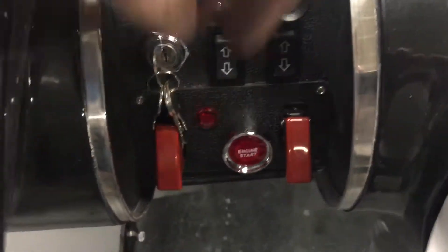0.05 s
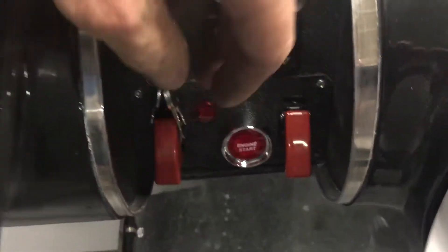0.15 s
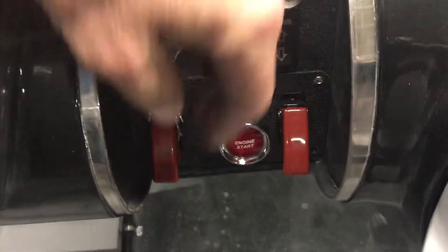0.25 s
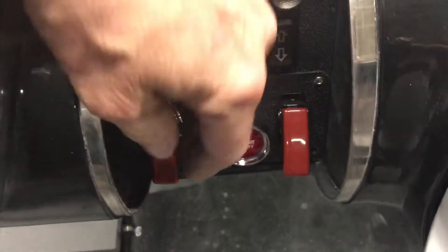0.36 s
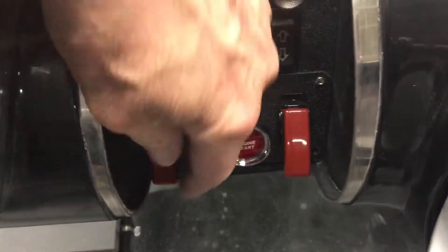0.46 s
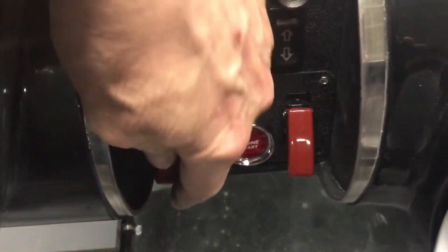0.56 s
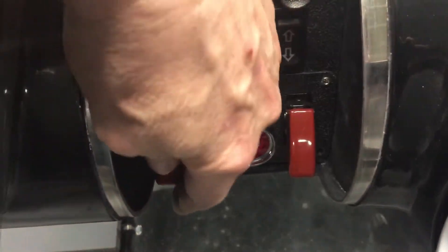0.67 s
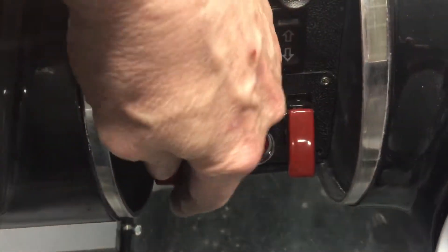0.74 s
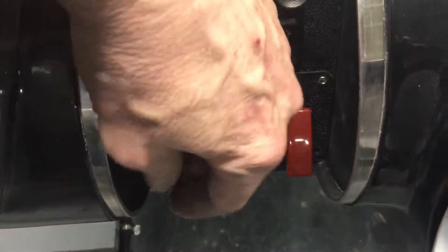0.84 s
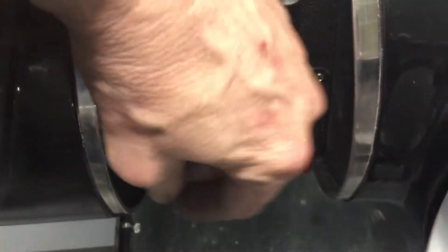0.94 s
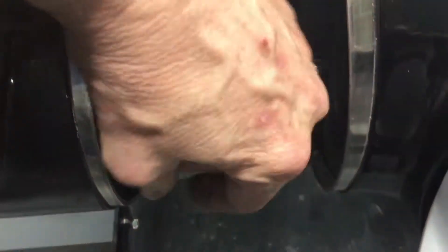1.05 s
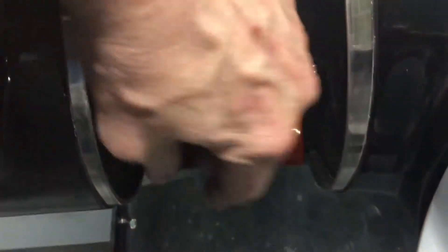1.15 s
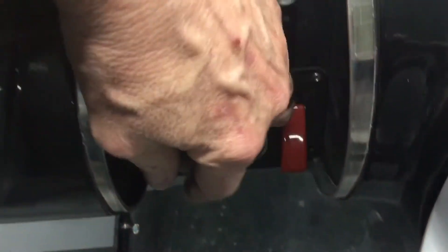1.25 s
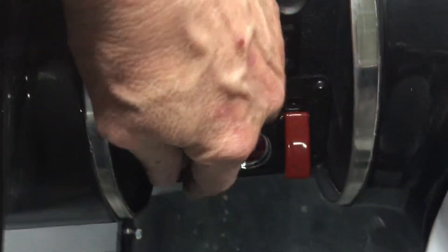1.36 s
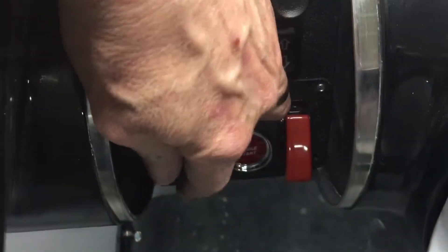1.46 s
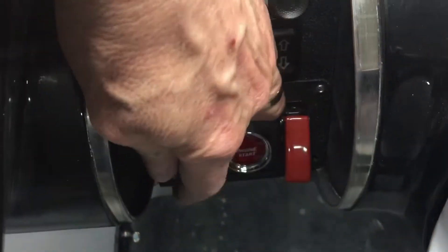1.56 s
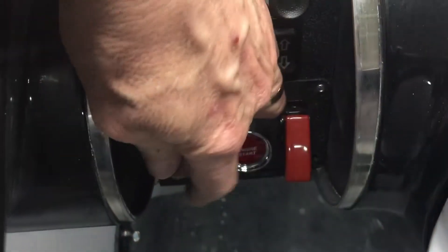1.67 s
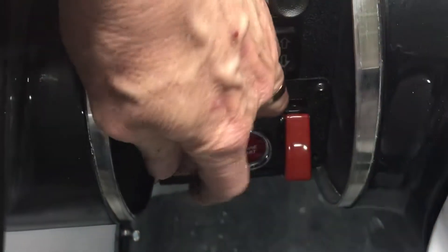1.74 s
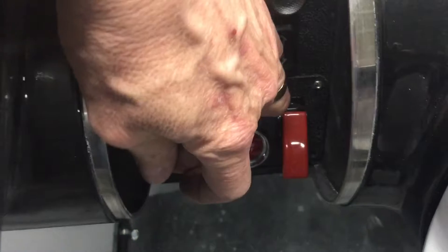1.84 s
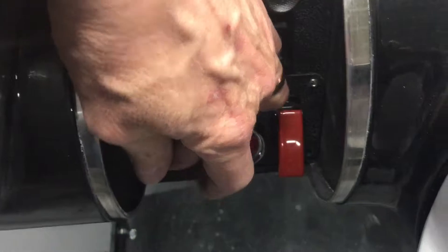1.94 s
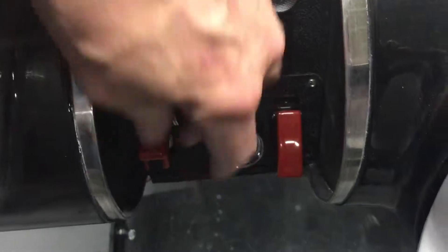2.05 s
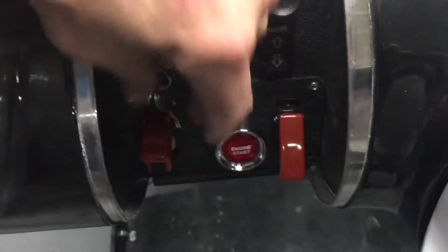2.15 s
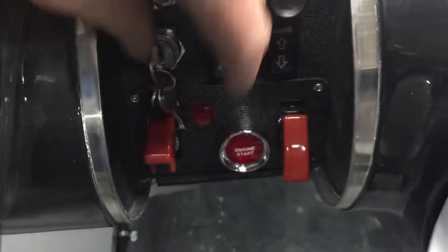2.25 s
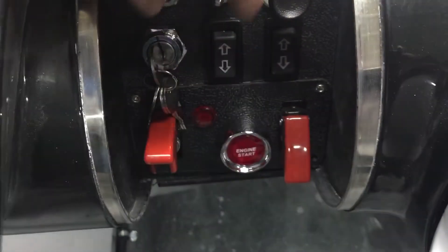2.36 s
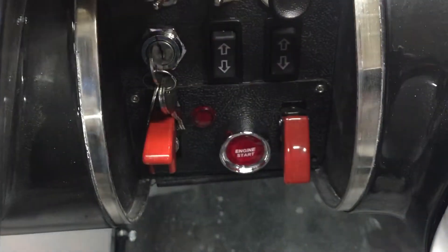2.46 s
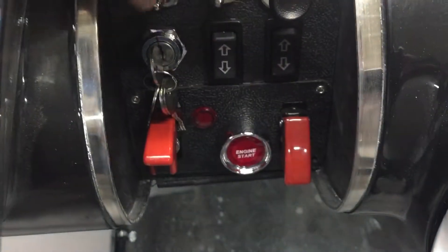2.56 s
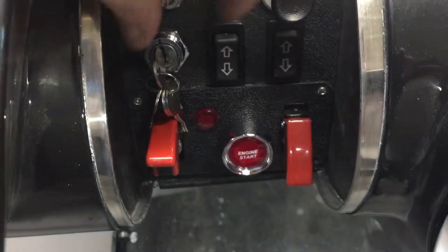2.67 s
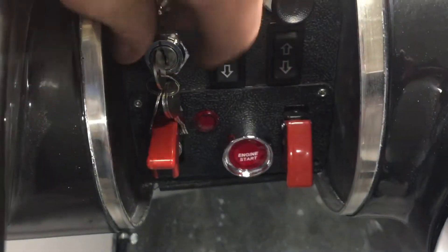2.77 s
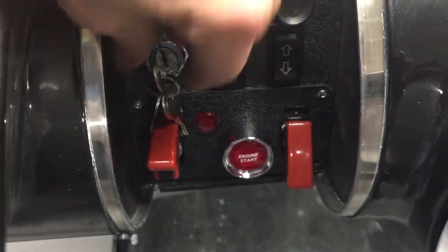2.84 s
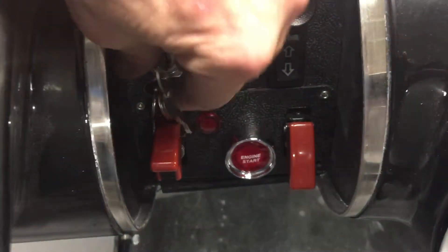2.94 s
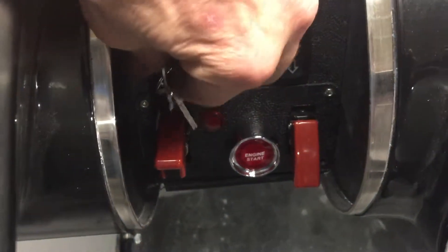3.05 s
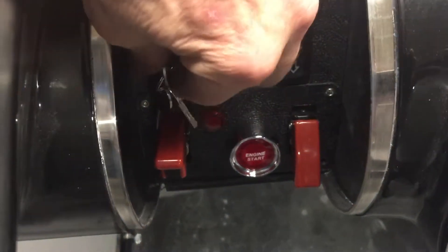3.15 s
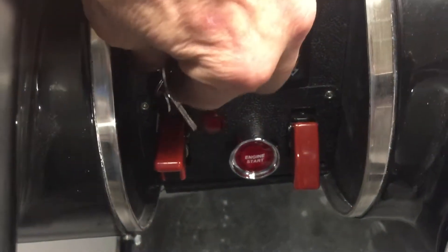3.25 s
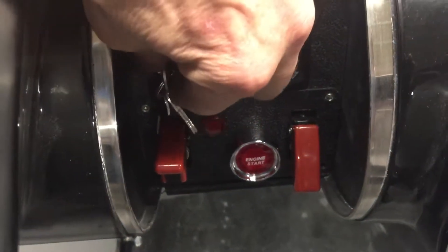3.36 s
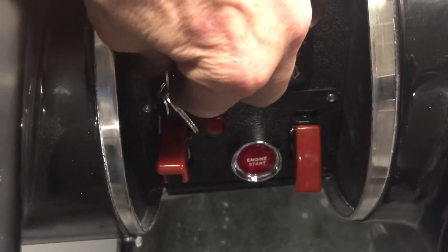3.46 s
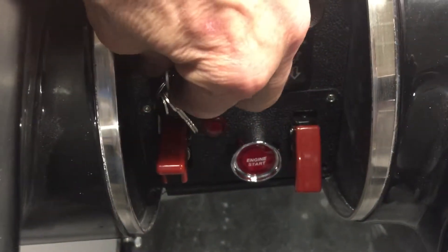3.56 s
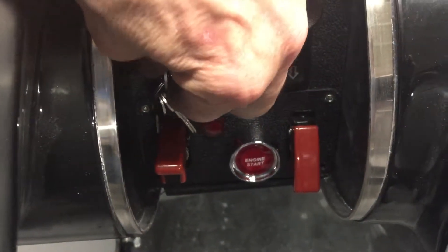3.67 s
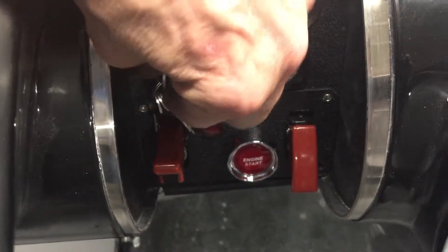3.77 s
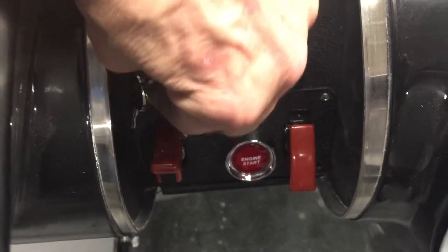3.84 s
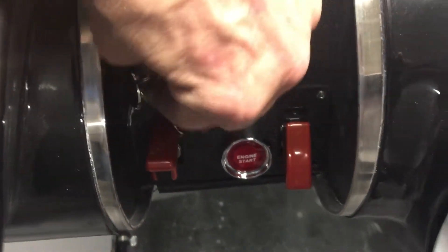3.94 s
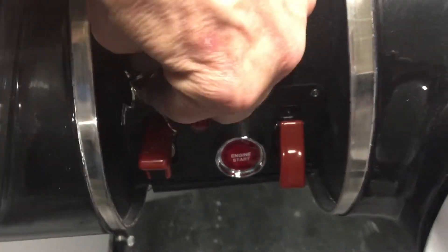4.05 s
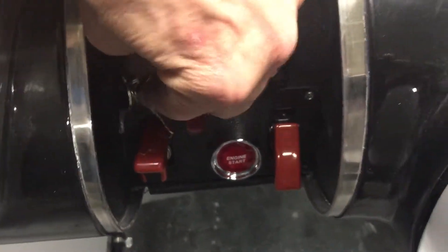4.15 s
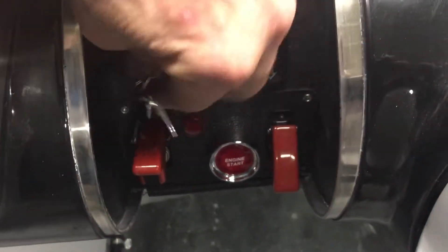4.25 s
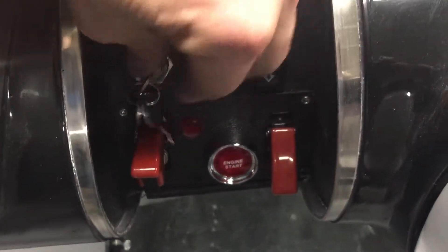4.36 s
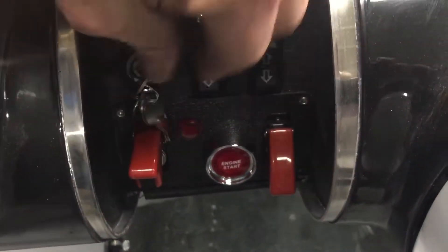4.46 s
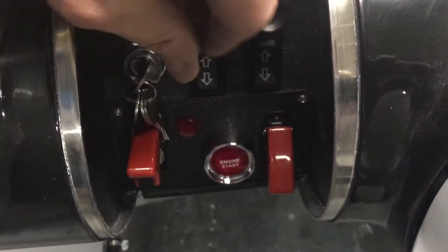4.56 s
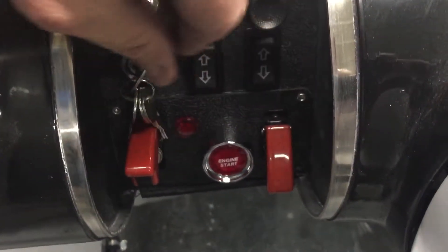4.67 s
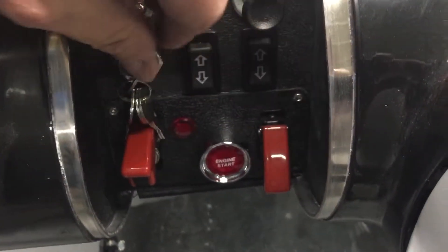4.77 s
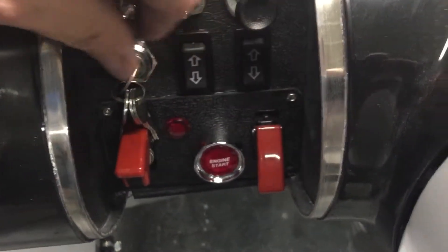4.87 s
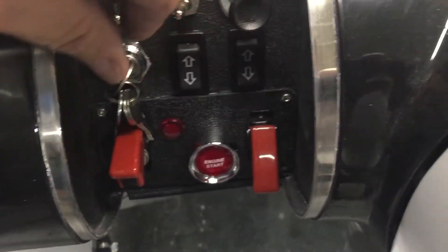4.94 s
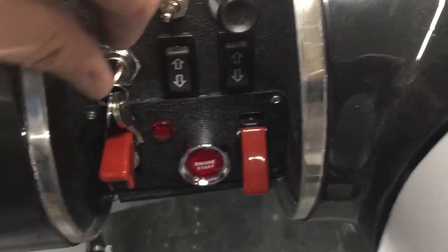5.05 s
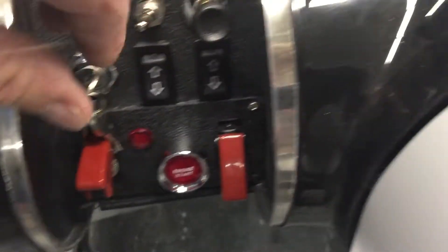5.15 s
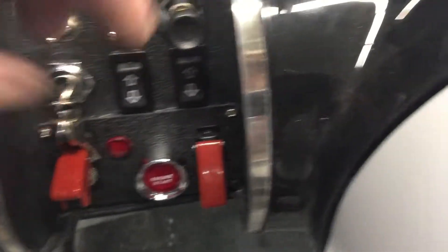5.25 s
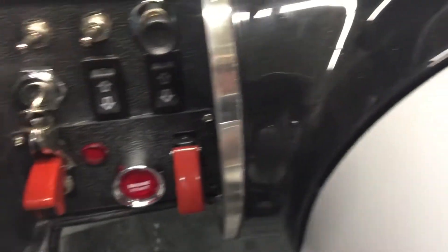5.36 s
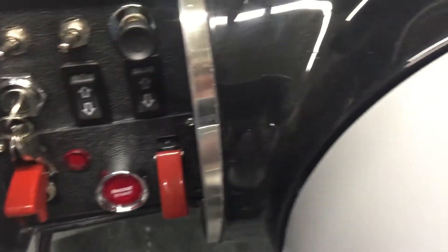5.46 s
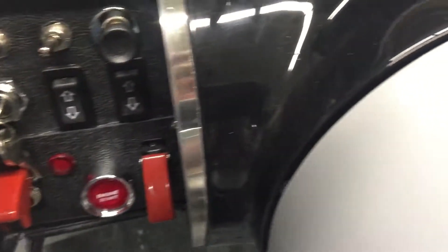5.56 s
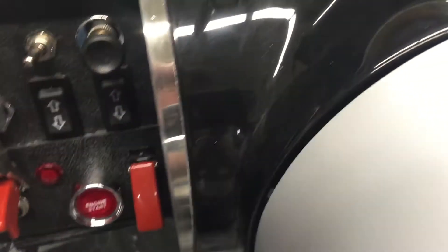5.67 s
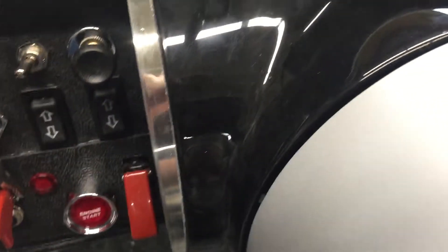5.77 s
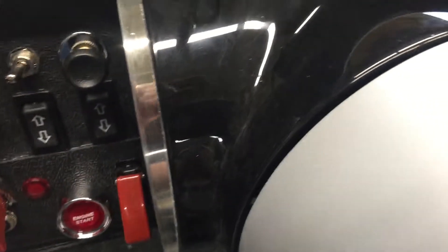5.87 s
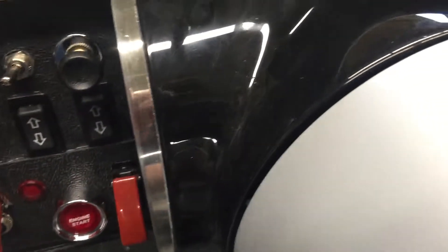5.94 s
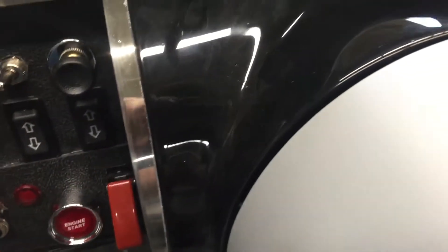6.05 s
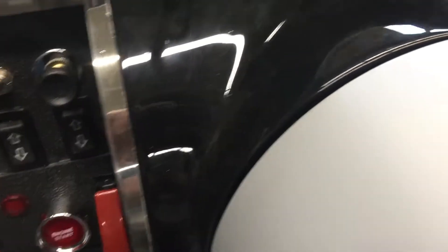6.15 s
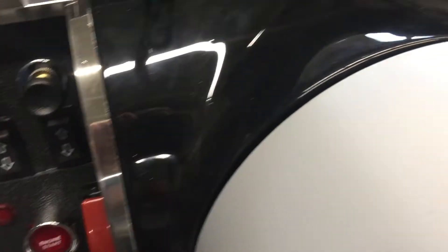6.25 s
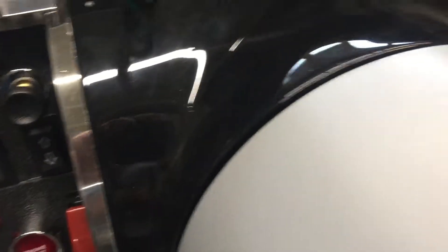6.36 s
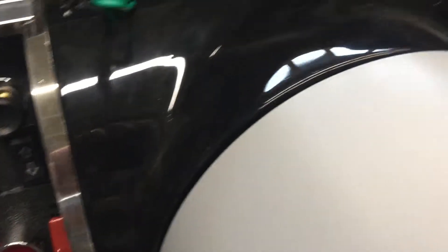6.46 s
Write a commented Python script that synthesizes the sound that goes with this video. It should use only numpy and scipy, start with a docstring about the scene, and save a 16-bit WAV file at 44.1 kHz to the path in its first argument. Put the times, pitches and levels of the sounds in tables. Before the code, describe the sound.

Hard plastic snap, toggle click with a deep clunk behind it, loud metallic key-turn crack and jangling keys, over low ventilation rumble in an echoing garage.

```python
"""In a garage, a hand works the switch panel of a parked car, close to the microphone.
It flips up a safety cover, throws the toggle under it (a relay clunks deeper in the car), turns the ignition key.
Each snap is a burst of dying noise over ringing panel modes; the swinging keys knock, ring and graze.
Fingers tick, cloth hisses, friction squeaks and far things shift, all shaped noise, with faint knocks on the dash.
Ventilation is low rumbling noise with wavering hum lines; cabin and garage echoes are decaying noise."""
import sys
import numpy as np
from scipy import signal
from scipy.fft import rfft, irfft
from scipy.io import wavfile
from scipy.ndimage import uniform_filter1d

SR = 44100
rng = np.random.default_rng(int(sys.argv[2]) if len(sys.argv) > 2 else 0)


def waveform_to_disk(signal):
    """Save audio, clipped to [-1, 1], as 16-bit WAV at the path in sys.argv[1]."""
    frames = np.transpose(np.atleast_2d(signal))
    scaled = np.clip(frames, -1, 1) * 32767
    samples = np.round(scaled).astype(np.int16)
    wavfile.write(sys.argv[1], SR, samples)


N = 287072  # length in samples
T = np.arange(SR) / SR  # the second after a blow


def amp(db):
    """Decibels to gain."""
    return 10 ** (np.asarray(db) / 20)


def unit(x):
    """Scales to rms 1."""
    return x / np.sqrt(np.mean(x ** 2) + 1e-20)


def read(points, hz):
    """Reads a table on a log-frequency axis."""
    f, value = np.transpose(points)
    return np.interp(np.log(hz + 1), np.log(f + 1), value)


def add(mix, s, sound):
    """Lays a sound into the mix at time s."""
    part = mix[round(s * SR):][:len(sound)]
    part += sound[:len(part)]


def dying(t60, t=T):
    """Envelope that falls 60 dB in t60 seconds."""
    return np.exp(-np.log(1000) * t / np.maximum(t60, 1e-3))


def swell(s, length):
    """A smooth rise and fall around time s."""
    return np.exp(-2 * ((np.arange(N) / SR - s) / length) ** 2)


def noise(spectrum, size=SR):
    """Noise of rms 1 with the given spectrum."""
    hz = np.fft.rfftfreq(size, 1 / SR)
    white = rng.standard_normal(size)
    return unit(irfft(rfft(white) * amp(read(spectrum, hz)), size))


def chatter(depth_db):
    """A gain that flutters at random, as loose parts shake; the depth is rms."""
    return amp(depth_db * noise([(80, 0), (300, -30), (1000, -90)]))


def colour(x, db):
    """Causal minimum-phase filter with the given level in each bin, so that attacks stay sharp."""
    # folding the cepstrum forward in time makes the filter causal
    cepstrum = irfft(np.log(amp(np.maximum(db, -100))), len(x))
    cepstrum[1:len(x) // 2] *= 2
    cepstrum[len(x) // 2 + 1:] = 0
    return irfft(rfft(x) * np.exp(rfft(cepstrum)), len(x))


def burst(spectrum, t60, size=8192):
    """A contact rings countless close modes at once: dying noise, ragged in detail and even in outline."""
    envelope = dying(t60, T[:size])
    x = rng.standard_normal(size) * envelope
    smooth_power = uniform_filter1d(abs(rfft(x)) ** 2, size=90)
    outline_db = 10 * np.log10(smooth_power + 1e-12)
    x = colour(x, read(spectrum, np.fft.rfftfreq(size, 1 / SR)) - outline_db)
    # as much energy as the bare envelope
    return x * np.linalg.norm(envelope) / np.linalg.norm(x)


def ring(modes, spread_db=0, size=SR):
    """Dying sines of alternating sign; where the blow lands changes the share of each."""
    t = T[:size]
    signs = (-1) ** np.arange(len(modes))
    shares = amp(spread_db * rng.uniform(-1, 1, len(modes))) * signs
    out = np.zeros(size)
    for share, (hz, db, t60) in zip(shares, modes):
        out += share * amp(db) * dying(t60, t) * np.sin(2 * np.pi * hz * t)
    return out


def fade_by_band(x, t60s):
    """Lets each frequency die at its own speed."""
    hz, t, z = signal.stft(x, SR, nperseg=256)
    faded = z * dying(read(t60s, hz)[:, None], t)
    return signal.istft(faded, SR, nperseg=256)[1][:len(x)]


def hump(hz, low_db, high_db, skirt_db):
    """A resonance at hz on broad shoulders, with their levels three octaves below and two above."""
    return [(hz / 8, low_db), (hz * 3 / 4, skirt_db), (hz, 0), (hz * 4 / 3, skirt_db), (hz * 4, high_db)]


def with_top(table, db, from_hz, full_hz):
    """A spectrum or a table of modes with its top raised by db, fully from full_hz up."""
    out = np.array(table, float)
    out[:, 1] += db * np.interp(out[:, 0], [from_hz, full_hz], [0, 1])
    return out


def varied(spectrum, spread_db):
    """Another spot is struck each time, so the colour changes."""
    return [(hz, db + spread_db * rng.standard_normal()) for hz, db in spectrum]


# Spectrum of the air noise. Each row: frequency in Hz, relative density in dB per Hz.
AIR_SPECTRUM = [(15, -51.5), (25, -20.5), (58, -4), (80, -1), (195, -9.5), (285, -11.5), (326, -16),
                (416, -24.5), (863, -31.5), (1100, -35), (16000, -49.5)]
# Hum lines. Each row: centre frequency in Hz, level in dB before the rumble curve.
HUM_LINES = [(75.4, -68.5), (120, -68), (228, -69)]
# Ride of rumble and hum. Each row: time in seconds, gain in dB.
RUMBLE_CURVE = [(0, 0.5), (1.4, 0), (1.9, -1), (3.8, 1.5), (5, -1), (6.5, 2.5)]
AIR_DB = -52.5


def ventilation(waver_hz=3.0, lumps_db=1.0):
    """Lumpy low rumble and faint even hiss, with hum lines of wavering pitch (waver and lumps are rms)."""
    drift = [(4, 0), (16, -40), (60, -120)]
    hum = np.zeros(N)
    for hz, db in HUM_LINES:
        pitch = hz + waver_hz * noise(drift, N)
        hum += amp(db) * unit(np.sin(2 * np.pi * np.cumsum(pitch) / SR))
    air = noise(AIR_SPECTRUM, N) * amp(AIR_DB)
    rumble = signal.sosfiltfilt(signal.butter(N=2, Wn=350, fs=SR, output="sos"), air)
    hiss = air - rumble
    level_db = np.interp(np.arange(N) / SR, *np.transpose(RUMBLE_CURVE))
    return hiss + (rumble + hum) * amp(level_db + lumps_db * noise(drift, N))


# Things shifting far off in the garage. Each row: start in seconds, level in dB before chatter and dulling,
# centre in Hz, rise in seconds, 60 dB decay in seconds.
FAR_HITS = [(6.099, -52.5, 986, 0.0011, 0.21), (6.136, -59, 4180, 0.017, .25),
            (6.141, -53, 1238, .008, 0.49), (6.151, -58.5, 450, 0.006, 0.96),
            (6.155, -67, 2200, 0.012, 0.48)]
FAR_TOP_HZ = 6860


def far_knocks():
    """Distant knocks are ragged, each around its own resonance, with the top dulled."""
    out = np.zeros(N)
    for s, db, hz, rise, t60 in FAR_HITS:
        clatter = noise(hump(hz, low_db=-10, high_db=-26, skirt_db=-10)) * chatter(depth_db=3)
        add(out, s, amp(db) * clatter * dying(t60) * np.minimum(T / rise, 1))
    return signal.sosfilt(signal.butter(N=6, Wn=FAR_TOP_HZ, fs=SR, output="sos"), out)


# Sleeve and skin brush the panel as the arm moves in and out.
# Each row: middle in seconds, length in seconds, peak level in dB.
ARM_SWISHES = [(.5, 0.063, -69.5), (2.18, 0.12, -64.5), (2.42, 0.083, -58), (2.782, 0.23, -69.5),
               (5.013, 0.17, -65.5)]
# Spectrum of the cloth. Each row: frequency in Hz, relative density in dB per Hz.
SLEEVE_SPECTRUM = [(1000, -65), (3000, 3.5), (4200, 12), (5200, 8), (8500, 12), (12000, 9.5), (16000, 7.5)]


def sleeve():
    """Cloth hisses with each move of the arm."""
    moves = sum(amp(db) * swell(s, length) for s, length, db in ARM_SWISHES)
    return noise(SLEEVE_SPECTRUM, N) * moves


# Faint rubs and squeaks. Each row: middle in seconds, length in seconds, pitch in Hz, bandwidth in Hz,
# peak level in dB.
SQUEAK_LIST = [(1.051, 0.0084, 2700, 300, -28), (1.44, 0.026, 7100, 1615, -59),
               (1.517, 0.044, 3850, 700, -58), (2.208, 0.081, 3910, 400, -60),
               (2.244, 0.011, 3530, 1490, -50), (5.581, 0.042, 3700, 150, -63),
               (5.625, 0.071, 1263, 50.2, -67)]


def squeaks():
    """Friction sings briefly in a narrow resonance."""
    out = np.zeros(N)
    for s, length, hz, width, db in SQUEAK_LIST:
        b, a = signal.iirpeak(hz, hz / width, fs=SR)
        tone = unit(signal.lfilter(b, a, rng.standard_normal(N)))
        out += amp(db) * swell(s, length) * tone
    return out


# Spectrum of the clunk. Each row: frequency in Hz, relative density in dB per Hz.
RELAY_SPECTRUM = [(59, -38.5), (100, -14.5), (229, -4), (350, -31.5), (600, 2), (800, -28), (910, -21),
                  (1520, -23), (2080, -13), (3320, -17.5), (3780, -22), (9410, -24), (16000, -37.5)]
# Decay of the clunk. Each row: frequency in Hz, 60 dB decay in seconds.
RELAY_DECAY = [(200, 1), (600, 0.59), (1300, 0.64), (3000, 0.69), (8000, 0.52), (15000, 0.35)]
# Ringing of the car body. Each row: frequency in Hz, level in dB before chatter, 60 dB decay in seconds.
CAR_BODY_MODES = [(135.2, -44, 0.72), (222.6, -34.5, 0.51), (445, -47, 0.71), (554, -35, .7),
                  (588, -35.5, 0.69), (654, -39, 0.61)]
RELAY_S, RELAY_DB, RELAY_RISE_S = 1.888, -29, 0.0026  # the level is that of the wash


def relay():
    """A heavy relay closes out of sight: it arrives as body resonances and a chattering wash of echoes."""
    out = np.zeros(N)
    wash = amp(RELAY_DB) * fade_by_band(noise(RELAY_SPECTRUM), RELAY_DECAY) * chatter(depth_db=1.0)
    body = ring(CAR_BODY_MODES) * chatter(depth_db=3.0)
    add(out, RELAY_S, (wash + body) * np.minimum(T / RELAY_RISE_S, 1))
    return out


# Decay of the garage. Each row: frequency in Hz, 60 dB decay in seconds.
GARAGE_DECAY = [(200, 0.71), (1400, 0.62), (3700, 0.73), (7000, 0.54), (14000, 0.13)]
# Colour of the garage echo. Each row: frequency in Hz, relative level in dB.
GARAGE_COLOUR = [(150, -1.5), (400, -4), (900, -18), (1600, -11.5), (4200, -21), (7000, -22), (9000, -21.5),
                 (15000, -28.5)]
CABIN_T60 = 0.14  # seconds


def in_room(x, cabin_db, garage_db, cabin_rise_s=0.0013, garage_rise_s=0.016):
    """The direct sound, quick reflections in the cabin, then the long tail of the garage."""
    cabin = rng.standard_normal(SR) * dying(CABIN_T60) * np.minimum(T / cabin_rise_s, 1)
    cabin /= np.linalg.norm(cabin)
    garage = fade_by_band(rng.standard_normal(SR), GARAGE_DECAY)
    garage /= np.linalg.norm(garage)
    garage = colour(garage, read(GARAGE_COLOUR, np.fft.rfftfreq(SR, 1 / SR)))
    garage *= np.minimum(T / garage_rise_s, 1)
    response = amp(cabin_db) * cabin + amp(garage_db) * garage
    return x + signal.fftconvolve(x, response)[:N]


# Fingers tapping small parts. Each row: start in seconds, relative tick level in dB,
# resonance of the part in Hz, relative push on the panel in dB.
FINGER_TAPS = [(0.406, -38.5, 5730, -59), (0.7122, -48, 2880, -72), (0.857, -41, 6890, -45),
               (2.5219, -42.5, 2945, -47), (3.3942, -50.5, 2640, -77), (3.491, -50, 3650, -71),
               (3.558, -60, 3950, -57.5), (4.2035, -35.5, 3600, -45)]
# Edge on edge, for nails and keys. Each row: frequency in Hz, relative density in dB per Hz.
TICK_SPECTRUM = [(500, -32), (2000, -12.5), (4500, -6), (6500, 1.5), (9000, -1), (11000, -2.5),
                 (14000, 1.5), (16000, -16)]
# Ringing of the switch panel, also under keys and switches.
# Each row: frequency in Hz, relative level in dB, 60 dB decay in seconds.
PANEL_RING = [(378, -16, .12), (545, -22, .07), (858, 0, .07), (1255, -13, .05), (1585, -18, .08),
              (1930, -15, .05)]
TOUCH_TICK_DB, TOUCH_PANEL_DB = -7.5, 4.5
TOUCH_BODY_DB, TOUCH_BODY_HZ, TOUCH_T60 = -6.5, 1460, 0.2  # dull knock of the plastic around the part
TOUCH_EDGE_DB, TOUCH_EDGE_T60 = -20, 0.011  # the fingernail
PART_CYCLES = 270  # a small part dies away in this many cycles, so the highest are the crispest


def fingers():
    """Light touches: a small part ticks at its own resonance, and the push knocks and rings the panel."""
    out = np.zeros(N)
    plastic = hump(TOUCH_BODY_HZ, low_db=-9.0, high_db=-26.5, skirt_db=-3)
    for s, tick_db, hz, push_db in FINGER_TAPS:
        part = hump(hz, low_db=-11, high_db=-26, skirt_db=-11)
        panel = amp(TOUCH_PANEL_DB) * ring(PANEL_RING, size=8192)
        add(panel, 0, amp(TOUCH_BODY_DB) * burst(plastic, TOUCH_T60))
        add(out, s, amp(tick_db + TOUCH_TICK_DB) * burst(part, PART_CYCLES / hz))
        add(out, s, amp(push_db) * panel)
        add(out, s, amp(tick_db + TOUCH_EDGE_DB) * burst(TICK_SPECTRUM, TOUCH_EDGE_T60))
    return out


# The heavy key head swings into the dash. Each row: start in seconds, level in dB.
DASH_HITS = [(4.360, -38), (4.461, -39.5)]
# Ringing of the dash shell. Each row: frequency in Hz, relative level in dB, 60 dB decay in seconds.
DASH_RING = [(370, -2.5, 0.3), (484, -14, 0.49)]


def dash():
    """The dash shell answers the heaviest swings with a hollow thud."""
    out = np.zeros(N)
    for s, db in DASH_HITS:
        add(out, s, amp(db) * ring(DASH_RING, size=12000))
    return out


# The key bunch on the dash. Each row: frequency in Hz, relative density in dB per Hz.
CLACK_SPECTRUM = [(150, -22.5), (400, 1), (1100, -7.5), (1950, 5.5), (2300, -8), (3600, 6), (4800, -12.5),
                  (6500, -19.5), (10000, -13.5), (16000, -31)]
# Ringing of the keys, before each knock varies it.
# Each row: frequency in Hz, relative level in dB, 60 dB decay in seconds.
KEY_RING = [(1990, -4, .09), (2645, -1, .085), (3140, -4, .06), (3520, -1, .055), (3830, -3, .07),
            (6500, -7, .05), (7520, -9, .07), (8290, -7, .055), (10720, -11, .13), (12350, -14, .2),
            (13290, -6, .12), (13460, -8, .09)]
KEY_TICK_DB, KEY_CLACK_DB = 2, -9  # how well an edge and a flat radiate
KEY_RING_DB, KEY_PANEL_DB = -17.5, -17  # the keys ring with the clack; the panel answers the whole knock
KEY_NOTE_DB, KEY_CYCLES = -7.5, 110  # the struck key's note: level over the clack, cycles until it dies
# a clack this hard parts the keys to ring freely; softer ones keep at least this share of the ring time
FREE_DB, HELD_SHARE = -16.5, 0.5
# the thin split ring takes over the top of each knock across this range; its share in tick and ringing
PING_FROM_HZ, PING_FULL_HZ = 9000, 11400
PING_TICK_DB, PING_RING_DB = 2.5, 16


def knock(clack_db, tick_db, ping_db, hz, tick_t60=0.0083, clack_t60=0.023, ring_spread_db=7):
    """One contact of the keys: sharp tick, duller clack, the struck key's note, ringing keys and panel."""
    # the keys lean on one another differently at each knock, which shifts their pitch and damping
    lean = 1 + rng.uniform(-1, 1, (len(KEY_RING), 3)) * [.01, 0, .35]
    freedom = np.clip(amp(clack_db - FREE_DB), HELD_SHARE, 1)
    modes = with_top(KEY_RING, ping_db - clack_db + PING_RING_DB, PING_FROM_HZ, PING_FULL_HZ)
    modes = modes * lean * [1, 1, freedom]
    tick = with_top(TICK_SPECTRUM, ping_db - tick_db + PING_TICK_DB, PING_FROM_HZ, PING_FULL_HZ)
    tick = varied(tick, spread_db=2.0)
    key = hump(hz, low_db=-33, high_db=-39.5, skirt_db=-25)
    edge_gain = amp(KEY_TICK_DB) * np.hypot(amp(tick_db), amp(ping_db))
    panel_gain = amp(KEY_PANEL_DB) * np.hypot(amp(clack_db), amp(tick_db))

    out = amp(clack_db + KEY_RING_DB) * ring(modes, ring_spread_db, size=12000)
    add(out, 0, edge_gain * burst(tick, tick_t60))
    add(out, 0, amp(clack_db + KEY_CLACK_DB) * burst(varied(CLACK_SPECTRUM, spread_db=3), clack_t60))
    add(out, 0, amp(clack_db + KEY_NOTE_DB) * burst(key, KEY_CYCLES / hz))
    add(out, 0, panel_gain * ring(PANEL_RING, spread_db=6.5, size=8192))
    return out


# While the bunch swings, the keys also graze one another at random.
# Each row: start in seconds, end in seconds, typical clack level in dB fed to the knock.
KEY_SWINGS = [(1.113, 1.21, -40), (3.06, 3.189, -39.5), (4.283, 4.391, -29), (4.457, 4.552, -32.5)]
GRAZES_PER_S, GRAZE_SPREAD_DB = 60, 2.5
GRAZE_TICK_DB, GRAZE_PING_DB = -18, -23  # relative to the clack
GRAZE_LOW_HZ, GRAZE_HIGH_HZ = 2000, 4320  # range of the keys that graze


def grazes():
    """Faint stray contacts between the knocks, one at a random moment of each short slot."""
    out = np.zeros(N)
    for start, end, db in KEY_SWINGS:
        slots = np.arange(start, end, 1 / GRAZES_PER_S)
        delays = rng.random(len(slots)) / GRAZES_PER_S
        levels_db = db + GRAZE_SPREAD_DB * rng.standard_normal(len(slots))
        for s, clack_db in zip(slots + delays, levels_db):
            hz = rng.uniform(GRAZE_LOW_HZ, GRAZE_HIGH_HZ)
            add(out, s, knock(clack_db, clack_db + GRAZE_TICK_DB, clack_db + GRAZE_PING_DB, hz))
    return out


# Knocks of the swinging keys, shaken by the cover, the hand and the lock. Each row: nominal time in seconds,
# just ahead of the contact, clack of the flat, tick of the edge and ping of the thin split ring in relative dB,
# note of the struck key in Hz.
KEY_KNOCKS = [(1.1153, -22.5, -26, -30, 2630), (1.1399, -16.5, -48, -33, 2680),
              (1.1777, -26.5, -49, -54, 3830), (1.1984, -27.5, -54, -51, 2670),
              (1.2324, -34.5, -50, -49, 5590), (1.2873, -44.5, -56, -62, 3790),
              (2.9994, -41.5, -57, -64, 3300), (3.0119, -33.5, -64, -53, 3780),
              (3.0711, -26, -32, -32.5, 2630), (3.0911, -26, -32, -33.5, 2730),
              (3.122, -27.5, -31.5, -44, 3770), (3.1487, -22.5, -50, -52, 3210),
              (3.1574, -27.5, -35, -51, 2620), (3.1804, -34.5, -44, -61, 3760),
              (4.2478, -36.5, -60, -71, 3470), (4.2801, -19.5, -28.5, -39, 3500),
              (4.3155, -36, -35, -38, 6410), (4.323, -19.5, -21, -33, 3730),
              (4.3517, -23, -25, -28.5, 3700), (4.358, -17, -41, -32, 3260), (4.394, -27, -48, -42, 3500),
              (4.4051, -22, -18, -28, 2000), (4.4613, -15.5, -23.5, -25.5, 3600),
              (4.5164, -28, -29, -52, 1970), (4.5228, -27.5, -24, -44, 3700),
              (4.5585, -30.5, -35, -51, 6520), (4.6216, -35, -50, -69, 3280)]
CONTACT_DELAY_S = 0.0005  # each contact comes this long after its listed time
# the bounce: mean delay, level, relative spread of the delay; it loses more of its tick and ping
REBOUND_S, REBOUND_DB, REBOUND_SCATTER = 0.011, -11, 0.3
REBOUND_TICK_DB = -27


def keys(slide_db=-25, slide_s=0.096):
    """Keys slide over one another, knock, and bounce once more softly."""
    out = np.zeros(N)
    for s, clack_db, tick_db, ping_db, hz in KEY_KNOCKS:
        lands = s + CONTACT_DELAY_S
        # a short scrape, a decay played backwards, grows until the contact
        slide = burst(CLACK_SPECTRUM, slide_s)[::-1]
        add(out, lands - len(slide) / SR, amp(clack_db + slide_db) * slide)
        add(out, lands, knock(clack_db, tick_db, ping_db, hz))
        flight = REBOUND_S * (1 + REBOUND_SCATTER * rng.uniform(-1, 1))
        bounce = knock(clack_db + REBOUND_DB, tick_db + REBOUND_TICK_DB, ping_db + REBOUND_TICK_DB, hz)
        add(out, lands + flight, bounce)
    return out


TREBLE_FROM_HZ, TREBLE_FULL_HZ = 5800, 7000  # the treble column of a blow acts across this range


def switch(blows, spectrum, modes, panel_pitch=1):
    """Each blow cracks and shakes the panel, pitched by the hand; the hardest also rings the switch itself."""
    out = np.zeros(N)
    panel = ring(np.array(PANEL_RING) * [panel_pitch, 1, 1], size=8192)
    for s, crack_db, t60, panel_db, treble_db in blows:
        crack = burst(with_top(spectrum, treble_db, TREBLE_FROM_HZ, TREBLE_FULL_HZ), t60)
        add(out, s, amp(crack_db) * crack + amp(panel_db) * panel)
    hardest = max(blows, key=lambda row: row[1])
    add(out, hardest[0], ring(modes, size=16000))
    return out


# Blows of the sprung cover. Each row: start in seconds, crack level in dB, 60 dB decay of the crack
# in seconds, panel ring in dB, treble lift in dB.
COVER_HITS = [(1.015, -55.5, 0.48, -49, -7.5), (1.0458, -37, 0.072, -40.5, -3),
              (1.0539, -5.5, 0.016, -10.5, 2), (1.0571, -19, 0.054, -23, -7)]
# Spectrum of its crack. Each row: frequency in Hz, relative density in dB per Hz.
COVER_SPECTRUM = [(60, -35), (200, -9), (400, -14.5), (650, -5.5), (1000, -1), (1400, -6), (1650, -6),
                  (2200, -3.5), (3000, -16), (3900, -7.5), (4800, -15.5), (7000, -11.5), (16000, -22)]
# Ringing of the cover. Each row: frequency in Hz, level in dB, 60 dB decay in seconds.
COVER_RING = [(404.2, -29.5, 0.12), (950, -21, 0.1), (1200, -25.5, 0.09), (1400, -13, 0.022),
              (1933, -22, 0.11), (3875, -25.5, 0.097), (7200, -25.5, 0.03)]


def cover():
    """The sprung safety cover snaps up: blows of dying noise over its own ringing and the panel's."""
    return switch(COVER_HITS, COVER_SPECTRUM, COVER_RING)


# Blows of the toggle, then the bright contact tick of the relay. Each row: start in seconds,
# crack level in dB, 60 dB decay of the crack in seconds, panel ring in dB, treble lift in dB.
TOGGLE_HITS = [(1.8560, -9, 0.015, -31, 0), (1.8629, -27.5, 0.068, -20, -12), (1.8912, -30, 0.027, -50, 10)]
# Spectrum of these cracks. Each row: frequency in Hz, relative density in dB per Hz.
TOGGLE_SPECTRUM = [(100, -41.5), (350, -18.5), (550, 1), (1400, 3.5), (2000, 1), (3200, 4), (4500, -5.5),
                   (6500, 0.5), (7500, -8), (13500, -3.5), (16000, -14)]
# Ringing of the toggle. Each row: frequency in Hz, level in dB, 60 dB decay in seconds.
TOGGLE_RING = [(2355, -25, .07), (2630, -25, .07), (3220, -24, .06), (6550, -21, .014)]


def toggle():
    """The toggle cracks and the relay contact ticks, with the panel pitched slightly up under the hand."""
    return switch(TOGGLE_HITS, TOGGLE_SPECTRUM, TOGGLE_RING, panel_pitch=1.035)


# Blows of the lock springing over its detent. Each row: start in seconds, crack level in dB,
# 60 dB decay of the crack in seconds, panel ring in dB, treble lift in dB.
LOCK_HITS = [(3.9068, -20, 0.029, -34, -1.5), (3.9107, -3, 0.0079, -15, 2.5), (3.9154, 3.5, 0.0092, -20, 2),
             (3.9214, -9.5, 0.0091, -25.5, -3.5), (3.924, -20.5, .09, -26, -11.5)]
# Spectrum of its crack. Each row: frequency in Hz, relative density in dB per Hz.
LOCK_SPECTRUM = [(50, -15.5), (150, -14), (300, -16), (550, -11), (1200, -7), (1800, -14.5), (2500, -7),
                 (4300, -2), (5000, -8.5), (6800, -3), (8500, -13.5), (16000, -17.5)]
# Ringing of the lock. Each row: frequency in Hz, level in dB, 60 dB decay in seconds.
LOCK_RING = [(432, -30, .2), (844.5, -23.5, .25), (1587, -26, 0.18), (2519, -23.5, 0.1),
             (3192, -24.5, 0.12), (3480, -23, 0.037), (4110, -13.5, 0.031), (4526, -15.5, 0.082),
             (5850, -16, 0.05), (6800, -19.5, 0.044)]


def lock():
    """The ignition lock springs over its detent: a tight run of cracks that rings lock and panel."""
    return switch(LOCK_HITS, LOCK_SPECTRUM, LOCK_RING)


def scene():
    """Cover, toggle, lock and keys in the cabin, over the sounds of the garage."""
    background = ventilation() + far_knocks() + sleeve() + squeaks() + relay()
    small = in_room(fingers() + dash() + grazes() + keys(), cabin_db=-11.5, garage_db=-8.5)
    near = small + in_room(cover(), cabin_db=-15.0, garage_db=-2.5)
    near += in_room(toggle(), cabin_db=-9.5, garage_db=-1.0)
    near += in_room(lock(), cabin_db=-16.0, garage_db=-2.0)
    # small parts radiate almost no bass
    near = signal.sosfilt(signal.butter(N=2, Wn=120, btype="high", fs=SR, output="sos"), near)
    return (background + near)[None]


EDGE_HZ = 16300  # upper band limit


def record(dry):
    """The microphone drops the deepest bass, peaks beyond full scale clip; then the band limit."""
    thinned = signal.sosfilt(signal.butter(N=4, Wn=38, btype="high", fs=SR, output="sos"), dry)
    clipped = np.clip(thinned, -1, 1)
    lowpass = signal.firwin(255, EDGE_HZ, window=("kaiser", 8), fs=SR)
    return signal.oaconvolve(clipped, lowpass[None], "same")


dry = scene()
out = record(dry)
waveform_to_disk(out)
```